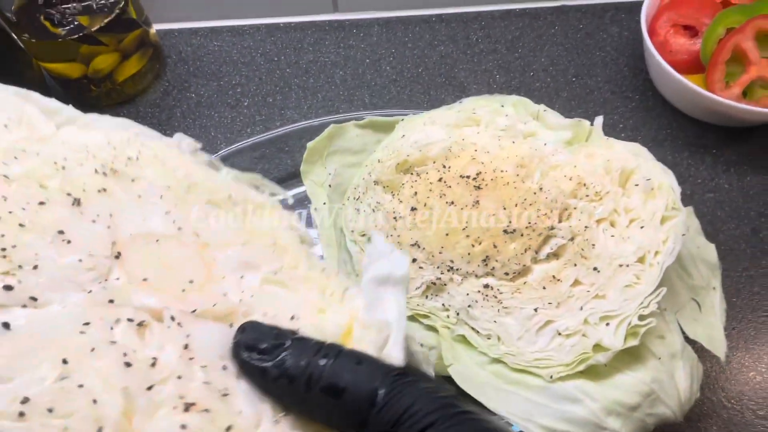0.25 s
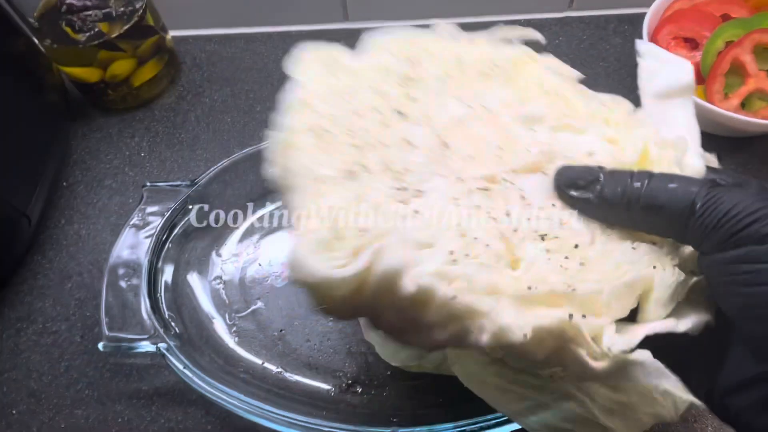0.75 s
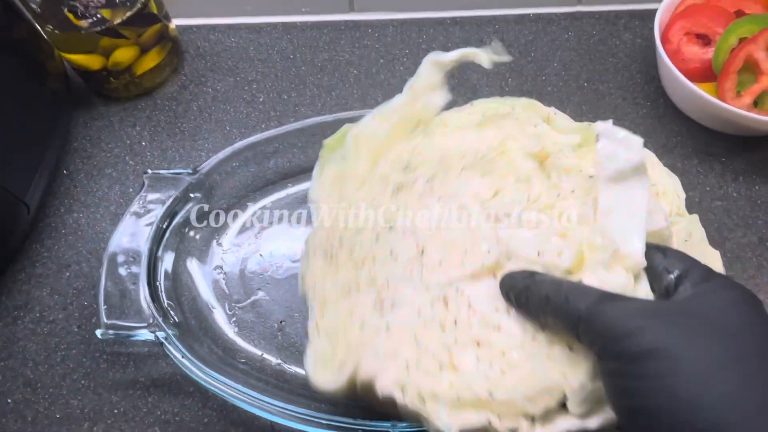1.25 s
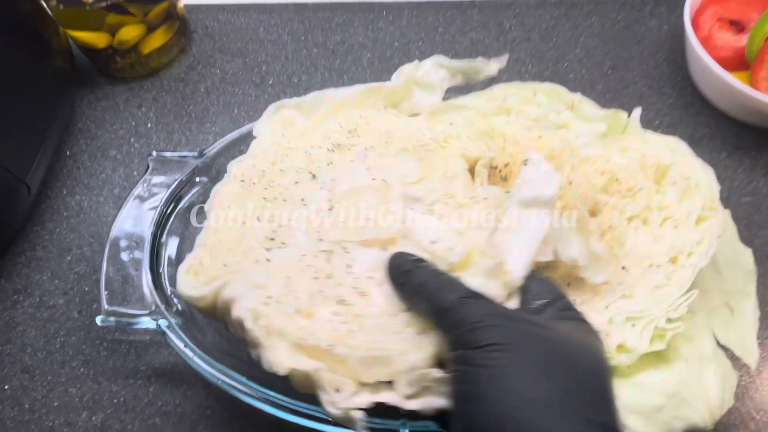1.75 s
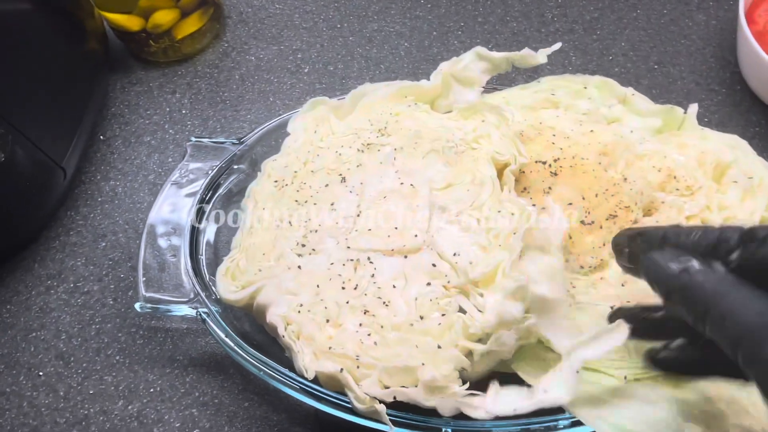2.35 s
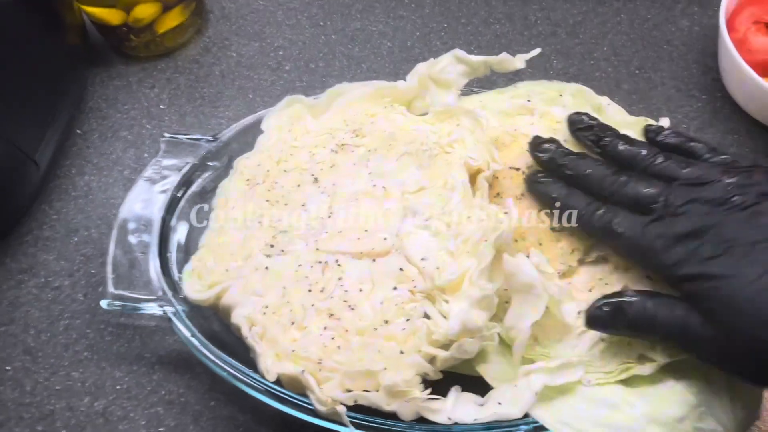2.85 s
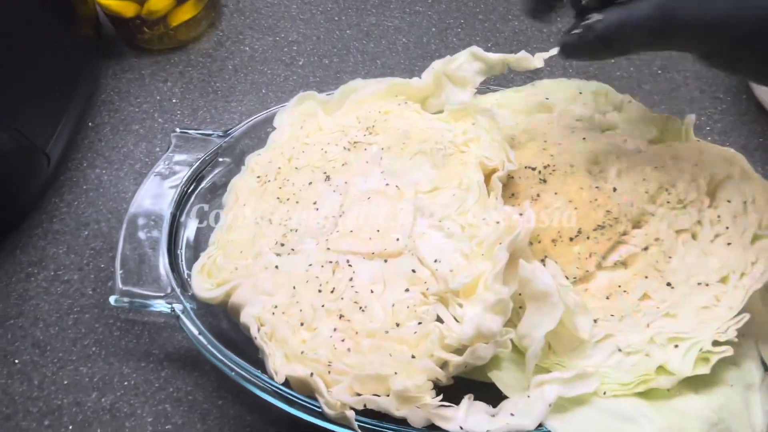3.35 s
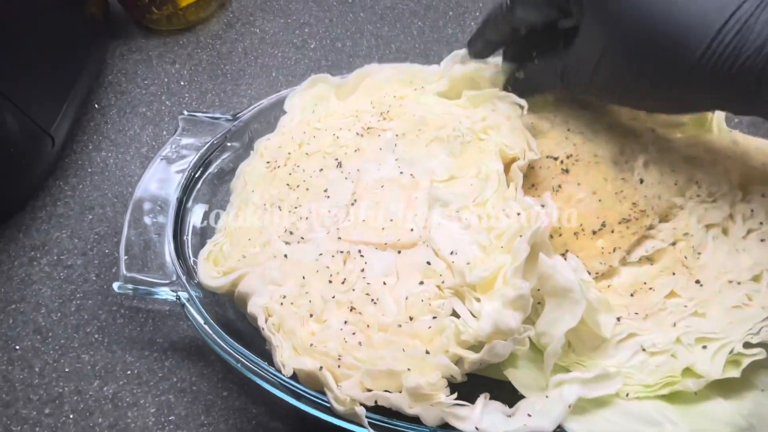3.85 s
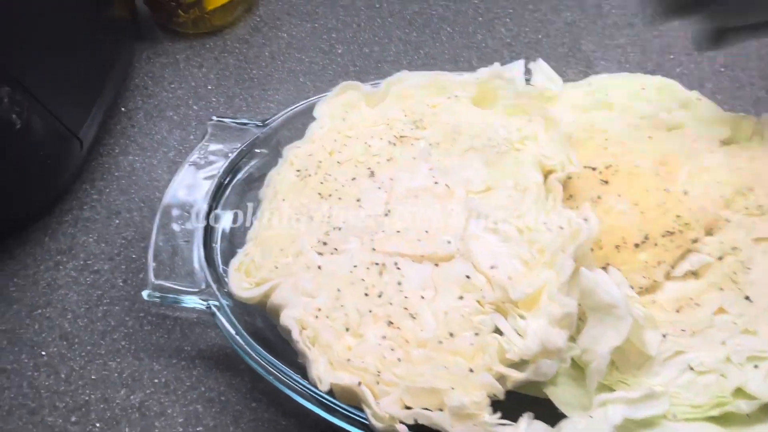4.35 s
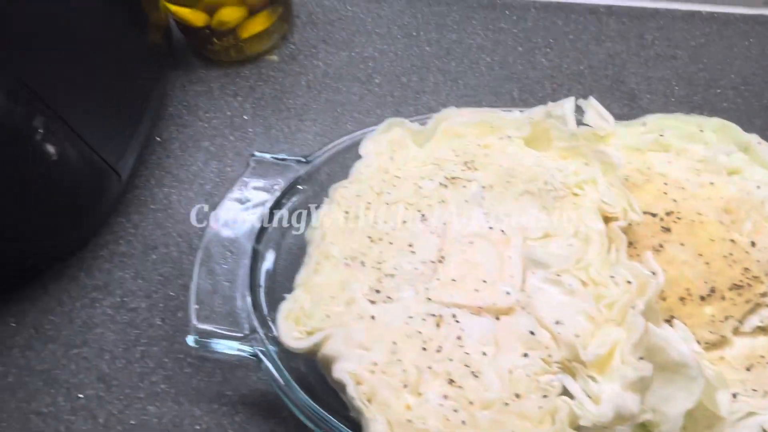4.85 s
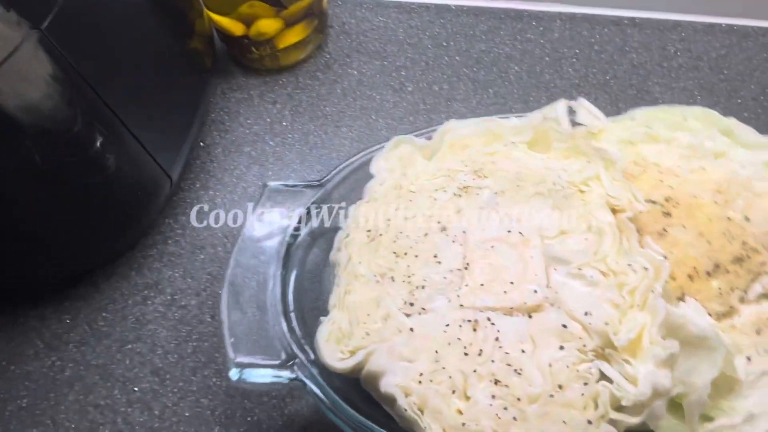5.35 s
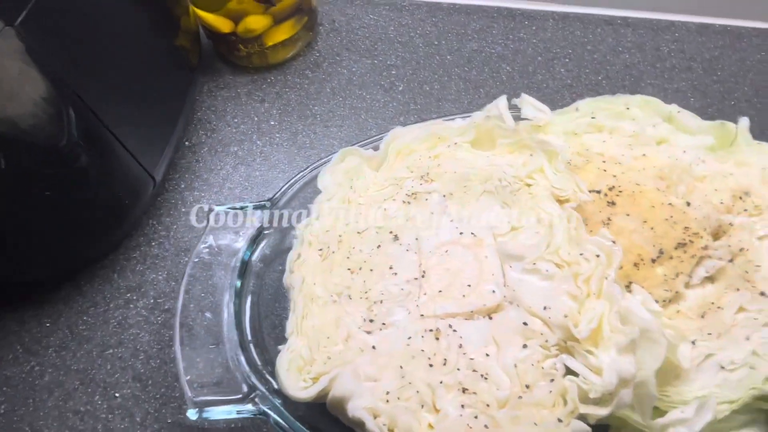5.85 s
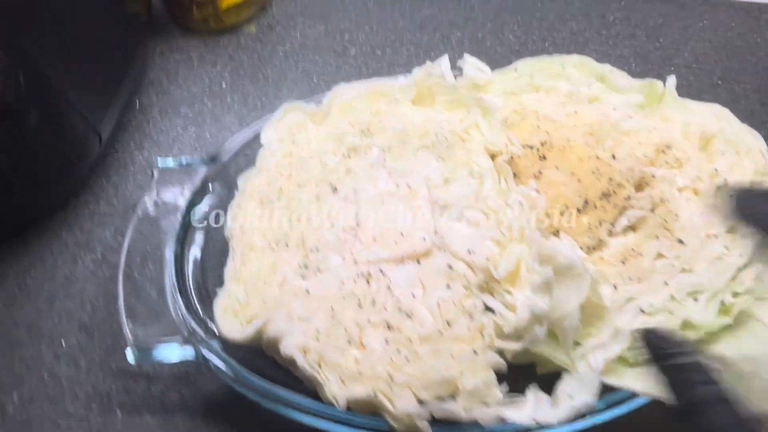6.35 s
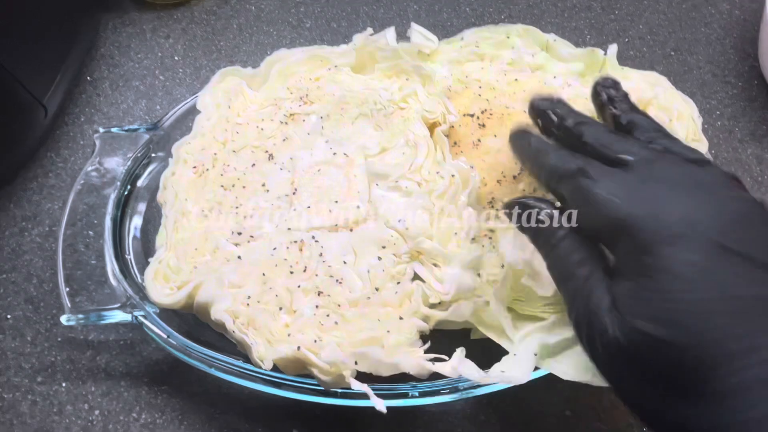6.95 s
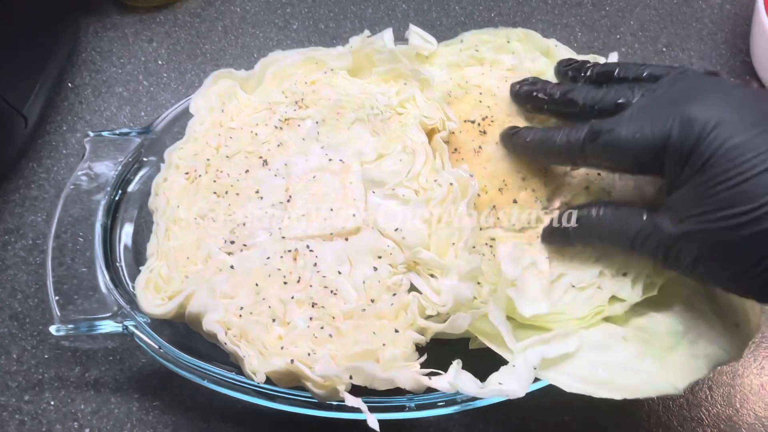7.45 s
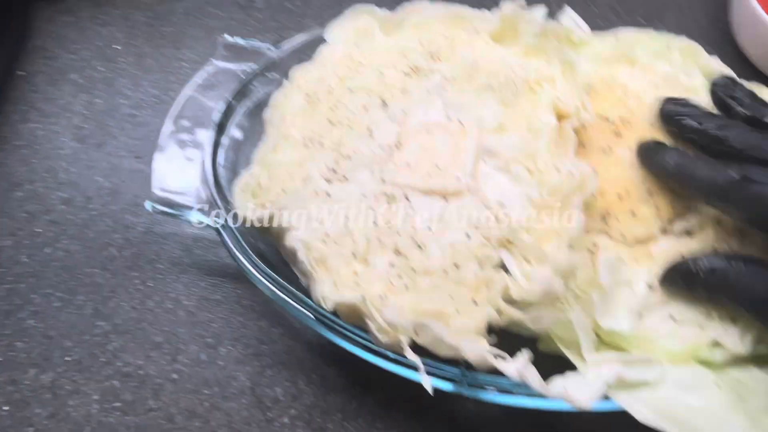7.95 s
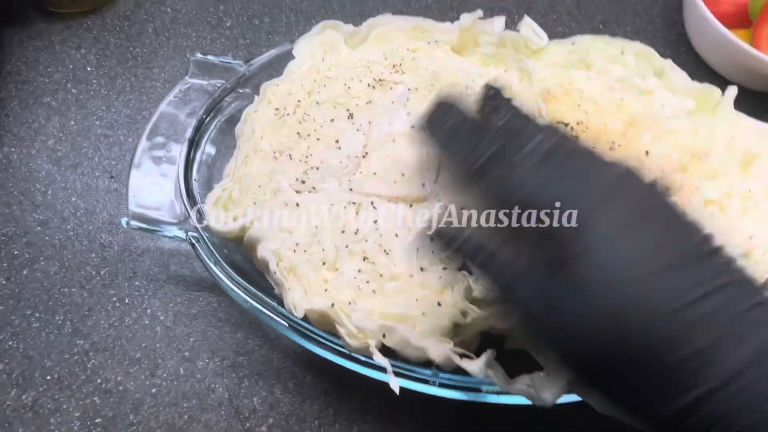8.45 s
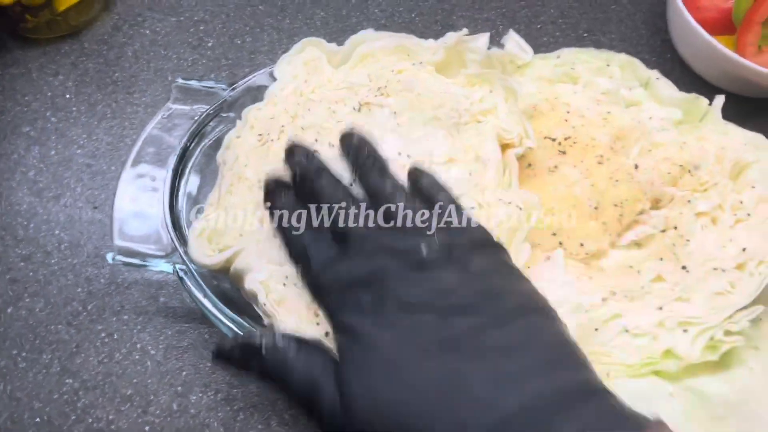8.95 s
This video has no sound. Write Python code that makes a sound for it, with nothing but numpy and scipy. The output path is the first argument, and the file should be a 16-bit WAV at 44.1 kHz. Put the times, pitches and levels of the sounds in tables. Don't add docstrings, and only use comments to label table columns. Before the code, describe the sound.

A gloved hand handles raw cabbage very near the microphone: brittle snaps, dense crinkling, rubbery treble ticks and low thuds of a glass dish on a worktop. Activity comes in bursts with near-silent gaps, the middle one boxy and knocking. Later rubs are gentler, and the glass rings at the end. Soft fridge hum, faint hiss and short kitchen reverberation surround it.

```python
import sys
import numpy as np
from scipy import signal
from scipy.fft import rfft, irfft, next_fast_len
from scipy.io import wavfile
from scipy.ndimage import uniform_filter1d, map_coordinates

SR = 44100
rng = np.random.default_rng(int(sys.argv[2]) if len(sys.argv) > 2 else 0)


def to_wav(s):
    ch = np.atleast_2d(s).T
    pcm = np.round(np.clip(ch, -1, 1) * 32767)
    wavfile.write(sys.argv[1], SR, pcm.astype(np.int16))


def amplitude_ratio(level_db):
    exponent = np.asarray(level_db, float) / 20
    return 10 ** exponent


N = 405719

# [f/Hz, level/dB]
LEAF_SPECTRUM = [(300, -19), (600, -2.5), (1000, -5.5), (2500, -1), (4500, -3.5), (6500, -1), (9000, 8.5),
                 (11000, 5.5), (12500, -11.5), (14000, -14), (15500, -24), (16300, -45)]


def unit(x):
    return x / np.sqrt(np.mean(x ** 2) + 1e-20)


def along(points, hz):
    f, v = np.transpose(points)
    return np.interp(np.log(hz + 1), np.log(f + 1), v)


def wobble(rate_hz):
    coarse = np.arange(0, N + 32, 32)
    knots = rng.standard_normal(int(N * rate_hz / SR) + 5)
    return np.interp(np.arange(N), coarse, map_coordinates(knots, [coarse * rate_hz / SR]))


def filtered(x, response):
    n = x.shape[-1]
    m = next_fast_len(n + 2048)
    return irfft(rfft(x, m) * response(np.fft.rfftfreq(m, 1 / SR)), m)[..., :n]


def mode(f, hz, width_hz):
    return 1j * f * width_hz / (hz * hz - f * f + 1j * f * width_hz)


def place(times_s, rows):
    at = (np.asarray(times_s) * SR).astype(int)[:, None] + np.arange(rows.shape[1])
    return np.bincount(at.ravel(), rows.ravel(), N + SR)[:N]


def spread(pair):
    # [f/Hz, correlation]
    alike = [(60, 1), (250, 0.94), (700, 0.087), (1700, 0.89), (4500, 0.019), (6500, 0.76), (9000, 0.82),
             (15000, 0.72)]

    def mid_side(hz):
        turn = np.arccos(np.clip(along(alike, hz), -1, 1)) / 2
        return np.sqrt(2) * np.array([np.cos(turn), np.sin(turn)])

    mid, side = filtered(pair, mid_side)
    return np.array([mid + side, mid - side]) / np.sqrt(2)


def coloured(spectrum, channels=1):
    return unit(filtered(rng.standard_normal((channels, N)), lambda hz: amplitude_ratio(along(spectrum, hz))))


def swells(peak_s, swell_s, fade_s, db, rest_db, hold_s=0):
    t = np.arange(0, N + 128, 128)[:, None] / SR
    climb = (peak_s - hold_s - t).clip(0) / np.maximum(swell_s, .005)
    fade = (t - peak_s) / np.maximum(fade_s, .005)
    down_db = 20 * np.maximum(climb, fade)
    power = amplitude_ratio(2 * rest_db) + amplitude_ratio(2 * (db - down_db)).sum(axis=1)
    return np.interp(np.arange(N) / SR, t[:, 0], np.sqrt(power))


def kitchen_air():
    # [f/Hz, level/dB, unsteadiness/dB]
    hum_tones = [(48.3, -51, 0.2), (116, -59, 2)]
    # [f/Hz, level/dB]
    whine = [(412, -62.5), (486, -63.5), (630, -67)]
    # [f/Hz, density/dB per Hz]
    fridge = [(36, -36), (62, -8.5), (70, -12.5), (100, -3.5), (123, 0), (172, -18), (205, -16), (284, -31),
              (300, -37), (368, -18.5), (440, -29.5), (680, -29), (900, -43), (1170, -98), (1980, -120)]
    # [f/Hz, level/dB]
    hiss = [(500, 9), (800, 10), (2000, -16), (4500, -21), (6500, -16), (9000, 15), (11000, 6.5),
            (12000, -53), (14000, -50)]
    t = np.arange(N) / SR
    tones = np.zeros(N)
    for hz, db, shake_db in hum_tones:
        level = amplitude_ratio(db + 0.5 + shake_db * wobble(6.9))
        tones = tones + level * np.sin(2 * np.pi * hz * t + 0.27 * wobble(5.7))
    for hz, db in whine:
        tones = tones + amplitude_ratio(db - 2.0 * t + 2.0 * wobble(5.2)) * np.sin(2 * np.pi * hz * t)
    rumble = amplitude_ratio(-50 + 0.24 * wobble(7.1)) * spread(coloured(fridge, channels=2))
    return tones + rumble + amplitude_ratio(-66.5 + wobble(2.86) / 2) * spread(coloured(hiss, channels=2))


def cracks(rows, over_db=0):
    s, db, hz = np.transpose(rows)[:, :, None]
    t = np.arange(1024) / SR
    fall = amplitude_ratio(-60 * t / 0.0032) + 0.38 * amplitude_ratio(-60 * t / 0.021)
    burst = fall * rng.standard_normal((len(s), len(t)))

    def leaf(f):
        return 3.46 * mode(f, hz, 0.21 * hz) + 0.86 * mode(f, 4500, 4700) * mode(f, 5800, 14000)

    return place(s[:, 0], amplitude_ratio(db + over_db - 6.5) * filtered(burst, leaf))


def strokes():
    # [peak t/s, crinkle/dB, swell/s per 20 dB, fade/s per 20 dB, fizz/dB re crinkle]
    rub_rows = [(0.019, -57, 0.025, 0.25, -13), (0.43, -51.5, 0.13, 0.066, -4),
                (1.03, -53.5, 0.37, .15, -13), (1.14, -46.5, 0.088, 0.28, -19),
                (1.3, -43.5, 0.12, 0.035, 0), (1.414, -52.5, 0.29, 0.032, 7), (1.56, -47, 0.094, 1, 0),
                (1.85, -43.5, 0.29, 0.27, -5), (2.7, -67, 0.38, 0.37, 3), (2.93, -53, 0.16, 0.38, -2.5),
                (3.681, -47.5, 0.15, 0.21, -29), (3.76, -53.5, 0.25, 0.036, 7),
                (3.904, -44, 0.065, 0.049, 3.5), (3.985, -35.5, 0.051, 0.16, 3.5),
                (4.04, -38, 0.15, 0.036, 5.5), (4.09, -43.5, .04, 0.054, 8.5), (4.16, -43, 0.05, 0.056, 8),
                (4.197, -47.5, 0.025, 0.044, 7.5), (4.76, -64.5, 0.37, 0.73, -18),
                (5.32, -37, 0.11, 0.058, 1.5), (5.5, -53, 1, 0.12, -6), (5.67, -47, 0.22, 0.06, -1),
                (5.869, -50.5, 0.54, 0.072, -4.5), (6.115, -41.5, 0.09, 0.1, 2.5),
                (6.68, -48, 0.29, 0.21, 3.5), (7.031, -52, 0.16, 0.63, -6), (7.55, -50, 0.15, 0.19, -8.5),
                (7.87, -47.5, 0.33, 0.1, -29), (8.13, -51.5, 0.41, 0.1, -8), (8.45, -53.5, 0.052, 0.79, 2),
                (8.97, -50.5, 0.57, 0.32, -2.5)]
    # [t/s, crinkle/dB, fizz/dB re crinkle, crumple/dB re crinkle]
    dab_rows = [(0.25, -49.5, -7, 3), (0.8, -37, -7.5, -14), (0.878, -37.5, -1.5, -3.5),
                (1.088, -47, -1.5, -9), (1.51, -52, 6, -15), (3.625, -54, -1, -8), (5.092, -43, -3, -8),
                (5.195, -52, -2, -3), (0.905, -46, -1, -5), (4.005, -41, 6, -8), (4.85, -44, -6, -8),
                (5, -52.5, -6, -5), (7.415, -48.5, -6.5, -5.5), (3.44, -63, 0, -7), (3.3, -66, 6, -12),
                (2.655, -64, -8, -3), (0.606, -62.5, 1, -5), (8.78, -55.5, 4, -4), (5.62, -44.5, 2, -10),
                (1.811, -35.5, -26, -15), (2.806, -38, -8, -5.5), (4.82, -34.5, -12, -13),
                (4.933, -42.5, 2.5, 1), (5.064, -38, -3, -1.5), (5.592, -38.5, 3, -11),
                (6.514, -41.5, -2, -2.5), (7.13, -42.5, -5, -21), (8.514, -42.5, -12.5, -3.5),
                (9.18, -48.5, -12, -12)]
    dab_swell_s, dab_hold_s, dab_fade_s = 0.018, 0.02, 0.062
    settle_db, settle_crumple_db, settle_fizz_db = -79, -5, 0.5
    rubs = [(*row, -4.5 - 0.19 * row[4], 0) for row in rub_rows]
    dabs = [(s, db - 2.0, dab_swell_s, dab_fade_s, fizz_db, crumple_db, dab_hold_s)
            for s, db, fizz_db, crumple_db in dab_rows]
    s, db, swell_s, fade_s, fizz_db, crumple_db, hold_s = np.transpose(rubs + dabs)
    crumple_db = crumple_db - 14.5 * (s < .72)
    registers = [(0, 0), (crumple_db, settle_crumple_db), (fizz_db, settle_fizz_db)]
    return [swells(s, swell_s, fade_s, db + over_db, settle_db + rest_db, hold_s)
            for over_db, rest_db in registers]


def grains(count, cycles, scatter_db):
    when, pitch, size = rng.random((3, count))
    hz = (500 * (13000 / 500) ** pitch)[:, None]
    t = np.arange(256) / SR
    level = amplitude_ratio(-scatter_db * np.log(size + .06))[:, None] * np.sqrt(hz) * hz ** .3
    return unit(place(when * N / SR, level * np.exp(-t * hz / cycles) * np.sin(2 * np.pi * hz * t)))


def patched(x, depth_db):
    z = signal.stft(x, nperseg=256)[2]
    field = uniform_filter1d(rng.standard_normal(z.shape[1:]), size=5, axis=0)
    field = uniform_filter1d(field, size=7, axis=1)
    return signal.istft(z * amplitude_ratio(depth_db * unit(field)), nperseg=256)[1][:, :N]


def rustle():
    # [t/s, grit/0-1]
    grit_rows = [(0, 0.7), (.9, 0.48), (1.5, 0.42), (1.9, 0.26), (3.4, 0.35), (3.6, 0.78), (4.3, 0.5),
                 (7.4, 0.36), (8.4, 0.3), (8.5, 0.5), (8.6, 0.33), (9.2, 0.38)]
    # [from t/s, to t/s]
    rummage_s = (4.72, 6.2)
    # [f/Hz, width/Hz, level/dB]
    hollow_modes = [(1034, 83, 10.5), (1580, 190, 2), (2560, 730, 0)]
    crinkling, crumpling, fizzing = strokes()
    t = np.arange(N) / SR
    grit_s, grit = np.transpose(grit_rows)
    grit = np.clip(np.interp(t, grit_s, grit), 0, 1.5)
    clumps = amplitude_ratio(np.minimum(grit * (4.4 * wobble(30) + 6 * wobble(160)), 7))
    clumps = clumps / np.sqrt(abs(uniform_filter1d(clumps ** 2, size=SR // 8)))
    friction = clumps * rng.standard_normal((2, N))
    crackle = 0.83 * grit * clumps * grains(count=6000, cycles=1.85, scatter_db=4)
    leaves = patched(spread(friction) + crackle, depth_db=2.8)
    leaves = filtered(leaves, lambda hz: amplitude_ratio(along(LEAF_SPECTRUM, hz)))

    def container(f):
        modes = sum(amplitude_ratio(db) * mode(f, hz, w) * (f < 5000) for hz, w, db in hollow_modes)
        return 0.6 + modes / 2 + 0.083 * (f > 5000)

    inside = np.interp(t, np.repeat(rummage_s, 2) + [-.05, 0, 0, .05], [0, 1, 1, 0])
    leaves = leaves + inside * (filtered(leaves, container) - leaves)

    def low(hz, edge_hz):
        return 1 / (1 + (hz / edge_hz) ** 4)

    crumple = unit(filtered(leaves, lambda hz: low(hz, 1234) - low(hz, 575)))
    crinkle = unit(filtered(leaves, lambda hz: low(hz, 6110) - low(hz, 1530)))
    fizz = unit(filtered(leaves, lambda hz: 1 - low(hz, 4440)))
    return amplitude_ratio(-1.0) * (crinkling * crinkle + crumpling * crumple + amplitude_ratio(5.5) * fizzing * fizz)


def snaps():
    # [t/s, peak/dB, f/Hz, fizz/dB re peak]
    rib_rows = [(0.771, -23.5, 2780, -8), (0.857, -27, 1560, -8), (1.111, -30, 2240, -22),
                (1.127, -27.5, 1060, 5.5), (1.294, -17, 2070, -8), (1.5515, -24, 2030, -5),
                (1.57, -29, 2210, -18), (1.799, -17, 2400, -3), (1.81, -14, 6600, -10),
                (2.784, -19, 1280, -9.5), (2.82, -22, 2500, -8), (1.002, -31, 1880, -2),
                (1.034, -37, 1800, 1), (1.31, -26, 2110, -9), (1.739, -30, 2310, -8),
                (7.043, -35, 2300, -12), (7.16, -31, 3980, -5), (8.825, -29.5, 3040, -5),
                (3.524, -24.5, 1270, -8), (4.797, -20, 2940, -17), (5.177, -31, 2170, 6),
                (5.213, -36.5, 1080, 13), (5.312, -27, 2670, -17), (5.576, -27, 1690, 9),
                (6.072, -27, 2240, 8), (6.1, -27, 1620, 7), (6.307, -33.5, 2140, -20),
                (6.963, -22.5, 1680, -4.5), (8.476, -17, 2200, -28), (8.963, -26, 2550, 9)]
    # [t/s, peak/dB, f/Hz, t60/s]
    glove_rows = [(3.664, -26, 7040, 0.051), (3.699, -20, 7600, 0.015), (3.758, -23, 8100, 0.084),
                  (3.853, -32, 6340, 0.047), (3.896, -26, 6370, 0.027), (3.972, -19.5, 6300, 0.091),
                  (4.071, -25, 6140, 0.099), (4.19, -25, 5940, 0.046), (6.466, -29, 4800, 0.039),
                  (6.485, -27.5, 5700, .03), (6.585, -37, 6170, .03), (6.649, -30.5, 6020, 0.04),
                  (8.444, -34.5, 6320, 0.052), (8.69, -35, 6900, 0.019), (8.758, -39, 6160, 0.049),
                  (7.059, -35.5, 6800, .019), (7.133, -20.5, 5270, 0.051), (7.4, -34.5, 5970, 0.04),
                  (9.039, -22, 7260, 0.12), (9.159, -14, 7050, .016)]
    # [t/s, peak/dB, f/Hz, t60/s]
    bump_rows = [
        (0.936, -35, 730, 0.063),
        (4.903, -13, 820, 0.028),
        (4.929, -19, 940, 0.025),
        (5.02, -7, 870, 0.031),
        (5.265, -18, 980, 0.1),
        (5.34, -15.5, 790, 0.034),
        (5.652, -18.5, 980, 0.065),
        (5.849, -25, 1010, 0.068),
        (7.864, -19, 610, .06),
    ]
    rib_t60_s, glove_fizz_db, bump_fizz_db = 0.031, 1, -12
    rows = [(*row, rib_t60_s) for row in rib_rows]
    rows += [(s, db, hz, glove_fizz_db, t60) for s, db, hz, t60 in glove_rows]
    rows += [(s, db, hz, bump_fizz_db, t60) for s, db, hz, t60 in bump_rows]
    s, db, hz, fizz_db, t60 = np.transpose(rows)[:, :, None]
    t = np.arange(3000) / SR
    fall = amplitude_ratio(-60 * t / np.clip(t60, .004, .3)) * (1 - np.exp(-t / (0.00015 + 0.013 * t60)))
    burst = fall * rng.standard_normal((len(s), len(t)))

    def body_and_fizz(f):
        body = 2.52 * mode(f, hz, 0.17 * hz) + 0.33 * mode(f, 1600, 5300) ** 2
        return body + amplitude_ratio(fizz_db) * amplitude_ratio(along(LEAF_SPECTRUM, f)) * (1 - 1 / (1 + (f / 5000) ** 4))

    return place(s[:, 0] - .001, amplitude_ratio(db - 2.5) * filtered(burst, body_and_fizz))


def worktop():
    # [t/s, peak/dB, f/Hz]
    thump_rows = [(0.945, -30, 197), (0.968, -31, 171), (1.808, -25.5, 171), (2.101, -40, 121),
                  (4.67, -38.5, 182), (1.833, -16.5, 139.3), (2.071, -38, 130), (2.797, -27, 119),
                  (4.009, -36, 126), (4.656, -32.5, 175), (5.028, -23, 153), (5.302, -28, 140),
                  (5.343, -23, 168.6), (6.98, -45, 117), (7.582, -35, 131), (7.865, -28, 214)]
    # [peak t/s, boom/dB, swell/s per 20 dB, drag/dB re boom]
    lean_rows = [
        (0.98, -30.5, 0.05, -3.5),
        (1.83, -28, 0.02, -2),
        (2.789, -40, -0.4, -25),
        (5.05, -26, .025, -14),
        (5.35, -29, 0.37, -12),
        (7.89, -30.5, 0.44, -1),
    ]
    # [f/Hz, level/dB]
    boom_spectrum = [(50, -37), (80, -12), (120, 1), (200, -5.5), (300, -32), (500, -54)]
    # [f/Hz, level/dB]
    drag_spectrum = [(150, -3), (250, -1), (400, 0), (600, -9), (1100, -26), (1600, -40)]
    # [f/Hz, width/Hz, level/dB]
    dish_modes = [(420, 90, 0), (680, 60, 5), (1000, 80, 13)]
    fade_s, rest_boom_db, rest_drag_db = 0.11, -47, -11.5
    s, db, hz = np.transpose(thump_rows)[:, :, None]
    t = np.arange(SR // 4) / SR
    ring = np.sin(2 * np.pi * hz * t)
    ring = ring + .5 * np.sin(2 * np.pi * 1.654 * hz * t) * amplitude_ratio(-40 * t / 0.35)
    thumps = place(s[:, 0] - .006, amplitude_ratio(db + 6.0 - 60 * t / 0.073) * (1 - np.exp(-t / 0.0044)) * ring)
    at_s, boom_db, swell_s, drag_db = np.transpose(lean_rows)
    boom = swells(at_s, swell_s, fade_s, boom_db, rest_boom_db)
    drag = swells(at_s, swell_s, fade_s, boom_db + drag_db, rest_boom_db + rest_drag_db)
    drag = np.hypot(drag, amplitude_ratio(1.5) * strokes()[1])

    def sings(f):
        return amplitude_ratio(along(drag_spectrum, f)) * (1 + sum(amplitude_ratio(d) * mode(f, c, w) for c, w, d in dish_modes))

    scrape = unit(filtered(rng.standard_normal(N), sings))
    return thumps + amplitude_ratio(-8.0 + 2.0 * wobble(25)) * (boom * coloured(boom_spectrum)[0] + drag * scrape)


def pops():
    # [t/s, peak/dB, f/Hz, t60/s]
    pop_rows = [(0.938, -30, 424, .05), (0.955, -30, 632, 0.069), (1.742, -31.5, 600, 0.065),
                (1.804, -22.5, 417, 0.055), (1.826, -25.5, 687, 0.062), (1.829, -34, 1000, .05),
                (1.955, -37, 410, .07), (1.957, -37, 613, 0.066), (2.081, -37, 420, 0.088),
                (4.006, -25, 2250, .015), (4.053, -26, 1380, .02), (4.648, -41.5, 744, 0.037),
                (4.715, -41, 2766, 0.021), (4.745, -48, 1030, 0.027), (4.759, -40, 1070, .03),
                (4.8, -26.5, 2960, .035), (4.83, -30, 980, 0.024), (4.879, -33.5, 940, 0.047),
                (5.06, -32.5, 2820, .05), (5.311, -30, 2700, .025), (5.656, -35.5, 996, 0.077),
                (5.66, -39, 1700, .04), (5.852, -38, 980, 0.04), (6.111, -26.5, 1620, .045),
                (6.12, -31.5, 1000, .04), (6.192, -32.5, 374, .03), (6.308, -40, 800, .03),
                (6.619, -33, 403, .03), (7.135, -29, 3060, .03), (8.053, -39.5, 3610, 0.019)]
    s, db, hz, t60 = np.transpose(pop_rows)[:, :, None]
    t = np.arange(4096) / SR
    waver = 4.3 * uniform_filter1d(rng.standard_normal((len(s), len(t))), size=100, axis=1)
    level = amplitude_ratio(db - 60 * t / np.clip(t60, .008, .15)) * (1 - np.exp(-t * hz / 0.72))
    return place(s[:, 0], level * np.sin(2 * np.pi * hz * t + waver))


def slides():
    # [peak t/s, level/dB, swell/s per 20 dB, fade/s per 20 dB]
    slide_rows = [
        (1.2, -51, .15, 0.22),
        (3.18, -62.5, .4, .2),
        (5.4, -60, .1, .15),
        (7.8, -62, 0.43, .15),
    ]
    s, db, swell_s, fade_s = np.transpose(slide_rows)
    hiss = filtered(rng.standard_normal(N), lambda f: mode(f, 2600, 370) + .3 * mode(f, 3800, 1500))
    return swells(s, swell_s, fade_s, db, rest_db=-88) * amplitude_ratio(2.7 * wobble(23)) * unit(hiss)


def knocks():
    # [t/s, peak/dB, t60/s]
    knock_rows = [
        (1.417, -52.5, 0.4),
        (1.739, -46, 0.28),
        (2.25, -36.5, 0.41),
        (2.279, -45.5, 0.2),
        (2.369, -57, 0.66),
        (2.495, -53, 0.26),
        (7.517, -53, 0.21),
    ]
    # [f/Hz, width/Hz, level/dB]
    cupboard = [(394, 51, 0), (536, 47, 1), (650, 39, -0.5), (996, 77, -16), (1190, 27, -18),
                (2170, 130, -47)]
    s, db, t60 = np.transpose(knock_rows)[:, :, None]
    t = np.arange(SR // 2) / SR
    fall = place(s[:, 0] - .004, amplitude_ratio(db + 8.0 - 60 * t / t60) * (1 - np.exp(-t / 0.0016)))

    def wood(f):
        return sum((-1) ** k * amplitude_ratio(d) * mode(f, c, w) for k, (c, w, d) in enumerate(cupboard))

    return fall * spread(unit(filtered(rng.standard_normal((2, N)), wood)))


def ticks():
    # [t/s, peak/dB]
    tick_rows = [(1.799, -17), (1.81, -14), (3.5232, -28.5), (3.5467, -37), (3.594, -41), (3.6126, -30),
                 (3.658, -37.5), (3.964, -21), (4.128, -30), (5.838, -37), (5.893, -37), (6.029, -36),
                 (6.055, -34), (4.0106, -14), (4.053, -17.5), (5.6511, -29), (5.7845, -27), (5.795, -29),
                 (5.822, -30), (5.8627, -21.5), (6.0376, -17.5), (6.0728, -11.5), (6.4664, -32),
                 (7.06, -32), (9.1625, -22.5)]
    s, db = np.transpose(tick_rows)[:, :, None]
    t = np.arange(512) / SR
    fall = amplitude_ratio(-60 * t / 0.003) + 0.22 * amplitude_ratio(-60 * t / 0.013)
    burst = fall * rng.standard_normal((len(s), len(t)))

    def bright(f):
        return (mode(f, 8900, 7200) ** 2 + 0.5 * mode(f, 2270, 4300)) / (1 + (f / 11500) ** 6)

    return place(s[:, 0], amplitude_ratio(db + 4) * filtered(burst, bright))


def glass():
    # [t/s, low ring/dB, high ring/dB re low]
    tap_rows = [
        (3.612, -43, -21),
        (4.649, -62, -15),
        (6.111, -50, -10),
        (6.308, -55, -19),
        (8.076, -56, -15),
        (8.11, -51, -16),
        (8.961, -39, -1),
        (9.046, -44, 15),
    ]
    # [f/Hz, level/dB, t60/s]
    glass_modes = [(1516, -14, 0.2), (2700, -16, 0.13), (5580, -11, 0.1), (6000, -15, 0.13),
                   (6750, -10, 0.19), (7510, -0.5, 0.18), (9787, -60, 0.19), (11100, -17, 0.29),
                   (13900, -20, 0.22)]
    low_hz = 1493
    s, db, high_db = np.transpose(tap_rows)[:, :, None]
    t = np.arange(SR // 3) / SR
    ring = amplitude_ratio(-60 * t / glass_modes[0][2]) * np.sin(2 * np.pi * low_hz * t)
    ring = ring + 0.6 * amplitude_ratio(-60 * t / 0.11) * np.sin(2 * np.pi * 1.018 * low_hz * t)
    for hz, level_db, t60 in glass_modes[1:]:
        start_db = high_db + level_db + rng.normal(0, 3.2, s.shape)
        ring = ring + amplitude_ratio(start_db - 60 * t / t60) * np.sin(2 * np.pi * hz * t)
    return place(s[:, 0], amplitude_ratio(db) * (1 - np.exp(-t / 0.00055)) * ring)


def room(x):
    # [f/Hz, t60/s]
    kitchen_t60 = [(200, 0.24), (2000, 0.14), (10000, 0.075)]
    hz, t, z = signal.stft(rng.standard_normal((2, SR // 2)), SR, nperseg=256)
    fall = amplitude_ratio(-60 * t / along(kitchen_t60, hz)[:, None])
    tail = spread(signal.istft(z * fall, SR, nperseg=256)[1])
    late = np.pad(x, (150, 0))[None]
    return signal.fftconvolve(late, tail / np.linalg.norm(tail[0]), axes=1)[:, :N]


def scene():
    # [t/s, peak/dB, f/Hz]
    lift_rows = [(0.0151, -31.5, 2980), (0.0204, -20.5, 7440), (0.035, -41, 2300), (0.092, -46, 6000),
                 (0.239, -25, 3000), (0.268, -35, 3500), (0.405, -35, 2400), (0.706, -46, 2500),
                 (0.72, -37.5, 2300), (0.113, -38, 2220), (0.1425, -47, 2710), (0.2244, -25.5, 2750),
                 (0.245, -24.5, 6000), (0.326, -30, 3100), (0.3596, -20.5, 2520), (0.375, -21.5, 6400),
                 (0.395, -27, 2640), (0.414, -24, 2490), (0.43, -21.5, 2910), (0.4462, -22, 2400),
                 (0.462, -23.5, 2660), (0.487, -23, 2550), (0.5609, -32.5, 2190)]
    # [t/s, peak/dB, f/Hz]
    flick_rows = [(0.9539, -41, 1510), (1.0018, -35, 1880), (1.0338, -38, 1910), (1.0495, -39, 1790),
                  (1.0614, -37, 7090), (1.125, -29, 1760), (1.3084, -23, 2310), (1.4119, -35, 6430),
                  (1.5002, -33, 6930), (1.5511, -22, 1930), (1.5644, -33, 2120), (1.571, -24, 2200),
                  (1.9507, -30, 5800), (3.7344, -34, 6550), (3.7474, -28, 6650), (4.1164, -30, 6890),
                  (4.7934, -24, 2970), (4.9124, -30, 2070), (5.1723, -35, 2230), (5.1921, -31, 2160),
                  (5.2117, -33, 2330), (6.7116, -34, 2300), (6.8399, -46, 6620), (6.8573, -43, 6890),
                  (7.1424, -25, 5650), (7.1594, -32, 5080), (7.6365, -34, 2340), (7.8635, -26, 1620),
                  (8.1164, -39, 1500)]
    near = cracks(lift_rows) + snaps() + worktop() + pops() + ticks() + glass()
    near = near + cracks(flick_rows, over_db=3.5)
    leaves = rustle()
    reverb = amplitude_ratio(-12.5) * room(near + leaves[0])
    return near + leaves + reverb + knocks() + kitchen_air() + slides()


def ports(dry):
    # [f/Hz, phase/rad]
    phase_rows = [(0, 0), (520, 0.9), (1550, -0.0), (2500, 0.6), (3790, 0.4), (4220, 0.9), (5430, 5.9),
                  (6800, 6.9), (7840, 8.9), (9730, 9.5), (11800, 12.4), (13800, 12.6), (15000, 15.7),
                  (16100, 15.6)]
    # [f/Hz, level/dB]
    bass_pan = [(100, -2), (500, -1.5), (1500, 0)]
    hz, phase_rad = np.transpose(phase_rows)
    side = np.array([[.5], [-.5]])

    def response(f):
        pair = np.exp(1j * side * np.interp(f, hz, phase_rad)) * amplitude_ratio(side * along(bass_pan, f))
        return pair * (1 + amplitude_ratio(-6.5) * mode(f, 11150, 350)) / (1 + (36 / (f + 1)) ** 8)

    return filtered(dry, response)


def starved(x):
    # [f/Hz, level/dB]
    audible = [(5000, -110), (8000, -99), (11500, -91), (12300, -82), (13500, -78), (16000, -88)]
    # [f/Hz, level/dB re other channel]
    masked = [(1000, -34), (1800, -7.5), (2500, -29), (6000, -2.5), (7500, -11), (9000, -5.5),
              (13000, -9.5)]
    hz, _, z = signal.stft(np.array([x[0] + x[1], x[0] - x[1]]) / 2, SR, nperseg=1024)
    width = 12
    band = np.arange(len(hz)) // width
    power = np.add.reduceat(abs(z) ** 2, np.arange(0, len(hz), width), axis=1)[:, band] / width
    treble = power[:, len(hz) // 3:].sum(axis=(0, 1))
    attack = treble > 3.6 * np.roll(treble, 2)
    power = uniform_filter1d(power, size=3, axis=2)
    power = power * amplitude_ratio(2.6 * rng.standard_normal((2, band[-1] + 1, z.shape[2])))[:, band]
    centre = ((band + .5) * width * hz[1])[:, None]
    heard = power > amplitude_ratio(2 * along(audible, centre))
    unmasked = power > amplitude_ratio(2 * along(masked, centre)) * power[::-1]
    keep = heard & (attack | unmasked)
    mid, side = signal.istft(z * keep, SR, nperseg=1024)[1][:, :N]
    return np.array([mid + side, mid - side])


def top_cut(x):
    return signal.sosfilt(signal.butter(12, 16510, fs=SR, output="sos"), x)


def record(dry):
    mix = starved(ports(dry))
    return top_cut(mix)


dry = scene()
out = record(dry)
to_wav(out)
```